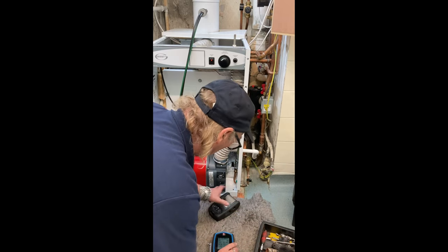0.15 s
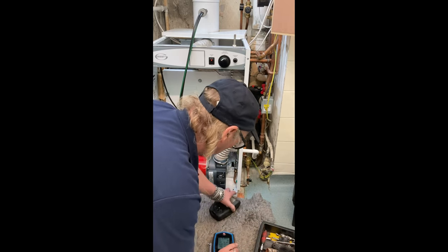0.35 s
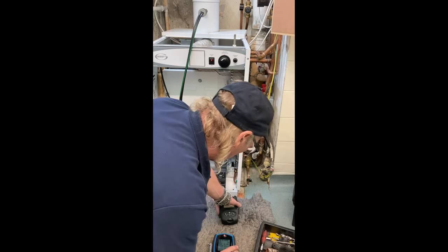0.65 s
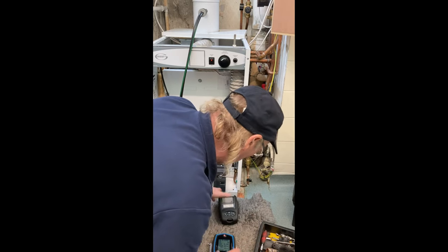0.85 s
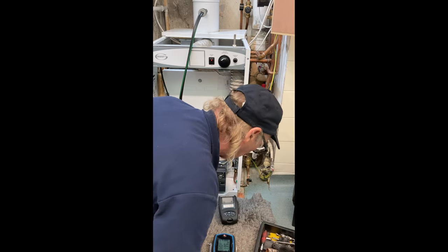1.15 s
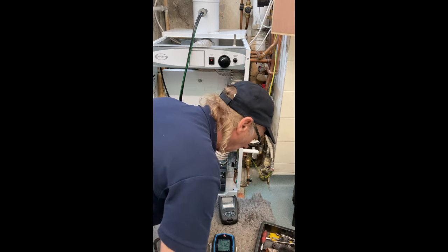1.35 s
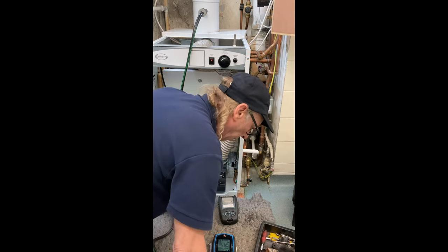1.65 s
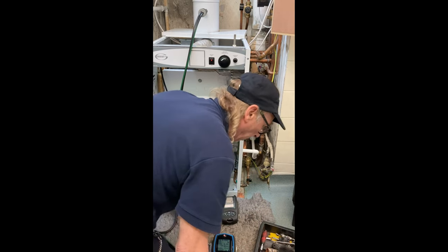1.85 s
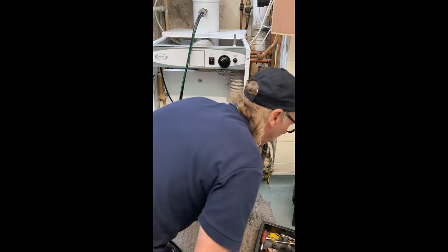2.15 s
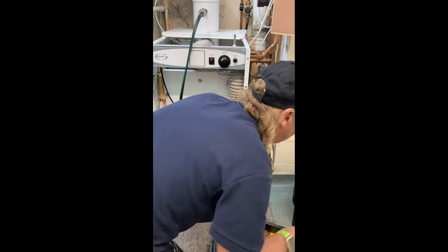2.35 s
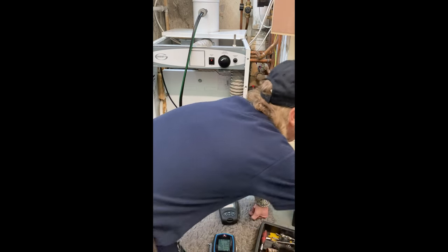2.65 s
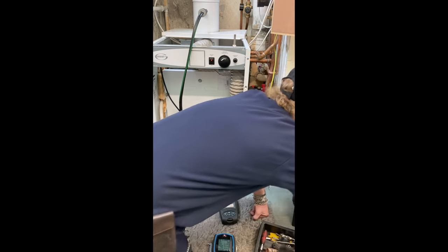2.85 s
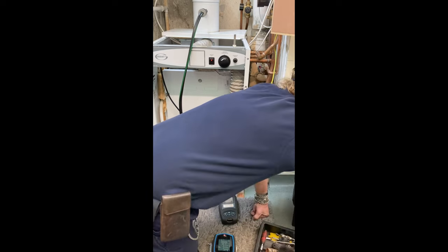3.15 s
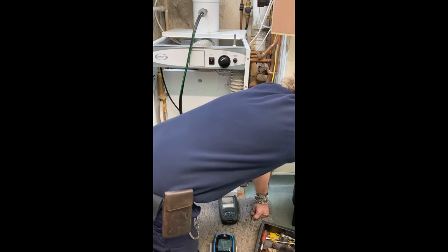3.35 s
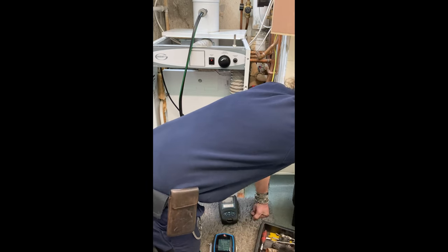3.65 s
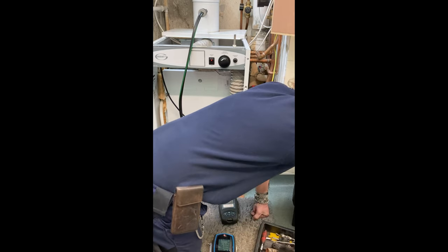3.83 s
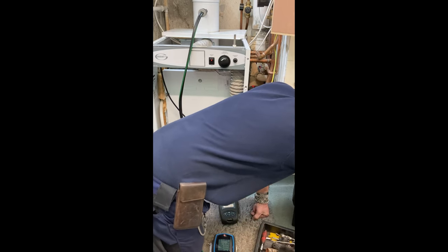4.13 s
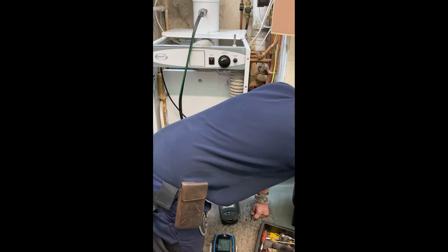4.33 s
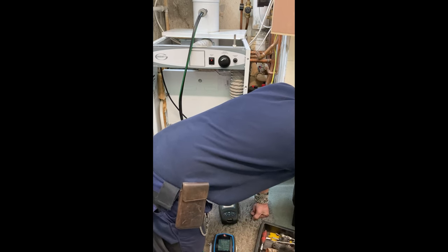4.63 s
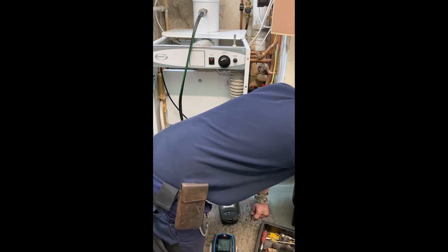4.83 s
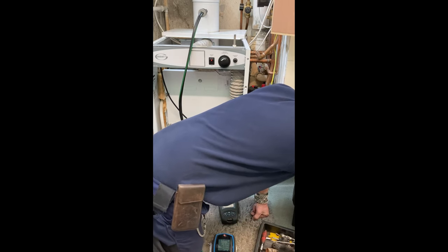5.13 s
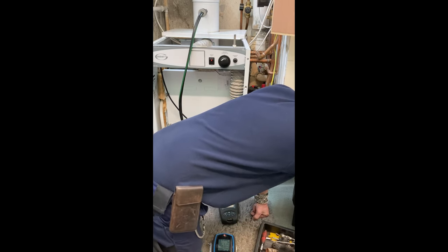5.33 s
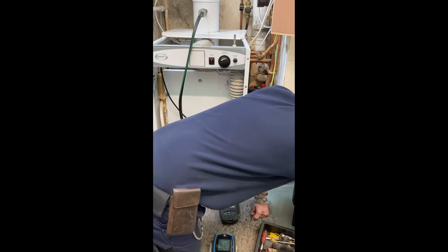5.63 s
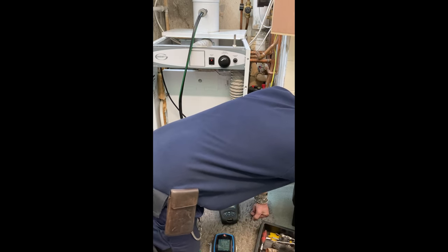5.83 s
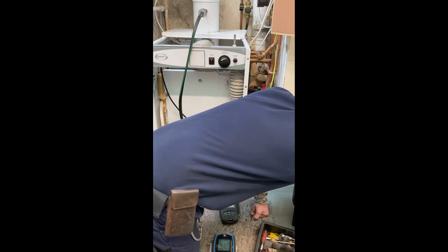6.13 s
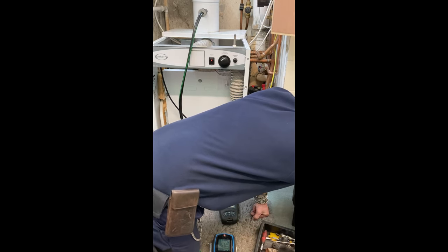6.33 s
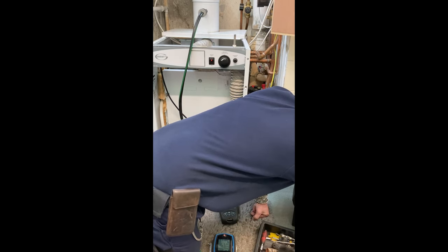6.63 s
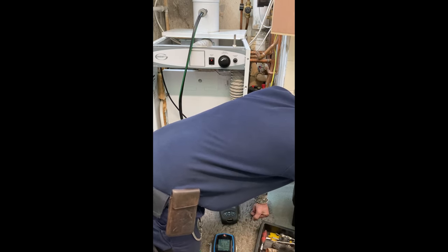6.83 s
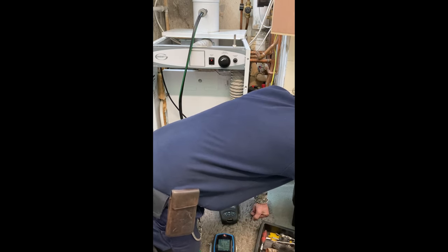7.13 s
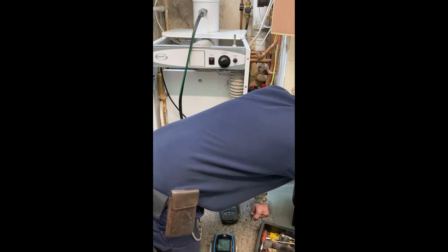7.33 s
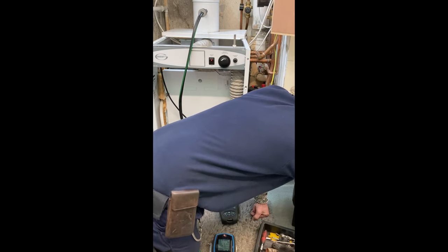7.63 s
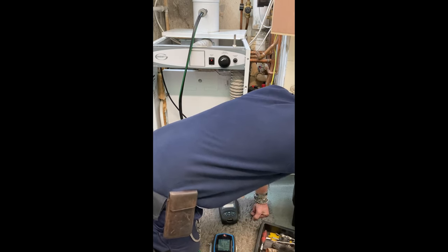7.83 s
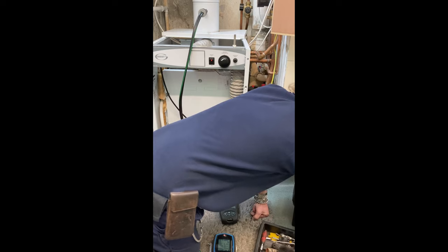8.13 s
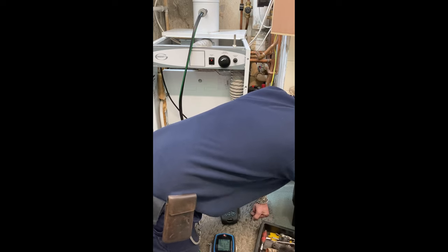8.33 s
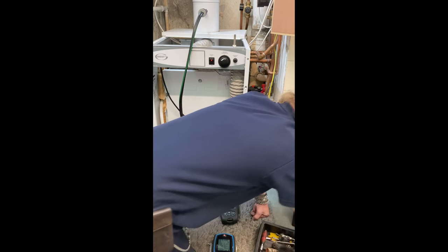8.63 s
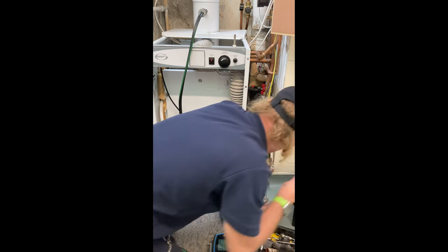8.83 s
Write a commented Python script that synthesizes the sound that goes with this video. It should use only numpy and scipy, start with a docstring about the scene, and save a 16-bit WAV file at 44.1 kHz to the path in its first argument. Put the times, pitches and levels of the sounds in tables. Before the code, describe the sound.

Close by a burner boiler, steady droning roar and hum continue throughout. Someone handles tools on the floor: faint cloth rustle, a sharp heavy clunk with rattling bounces, a second clatter, short gritty scrapes and small ticks, a bright knock, busy clicking, then a weighty thud and a final loud sheet-metal clang. Small reverberant utility room, stereo, wide but near.

```python
"""Handling parts beside an oil boiler

An oil boiler runs in a small hard-walled room: noise shaped like flame rumble and fan hiss, steady
tones of the burner motor, pump and mains, and a pump whine that swells and sinks.
Someone kneeling beside it handles tools and parts: five heavy knocks ring the sheet metal and make
loose parts bounce, among light clicks from dull to hard. Both mix noise bursts with fading tones.
Short scrapes are strings of uneven grains, and the brush of a sleeve is grainy hiss.
"""
import sys
import numpy as np
from scipy import signal
from scipy.fft import rfft, irfft, next_fast_len
from scipy.io import wavfile

SR = 44100
rng = np.random.default_rng(int(sys.argv[2]) if len(sys.argv) > 2 else 0)


def put_to_file(sound):
    """Save the sound as 16-bit audio at rate SR, in the file named by the first command-line argument."""
    columns = np.atleast_2d(sound).T  # one column per channel
    safe = np.clip(columns, -1, 1)
    whole_steps = np.round(safe * 32767)
    wavfile.write(sys.argv[1], SR, whole_steps.astype(np.int16))


N = 396018
TIME = np.arange(N) / SR  # seconds, whole scene
TAIL = np.arange(SR * 3 // 4) / SR  # seconds, longest ring of a blow

# Flame and fan air: [f/Hz, relative level/dB per Hz]
AIR_COLOUR = [(25, -24), (42, -22), (54, -2), (125, -3), (260, -3.5), (400, -4.5), (520, -15), (760, -22),
              (1300, -18), (3000, -18), (6100, -22), (8800, -31.5), (11000, -24), (15500, -36.5)]
AIR_DB = -45  # before flutter and flicker
# Broad resonances of the casing in that noise: [f/Hz, width/Hz, lift/dB]
CASING_RESONANCES = [(197, 13.3, 8.5), (448.4, 10, 11), (646, 123, 8.5), (959, 56, 13.5), (1578, 14, 13),
                     (1790, 21, 5), (2130, 32, 13), (2280, 11, 14), (2413, 54, 9), (3400, 30, 13.5),
                     (3634, 370, 8), (3733, 21, 16.5), (4460, 1130, 7.5), (8550, 1150, 10.5)]
# Narrow standing waves of firebox and flue, fed by the flame, before their slow changes:
# [f/Hz, width/Hz, rms level/dB]
FLUE_DRONES = [(120.5, 2, -65), (163.2, 3, -54.5), (280.6, 1.5, -63), (309, 5, -61), (338.5, 10, -52),
               (2172, 26, -65)]
# The drones swell and sink slowly (rms depth, fastest swells a second) ...
SWELL_DB, SWELL_PER_S = 1, 1.6
# ... start strong and ease off steadily ...
DRONE_START_DB, DRONE_SAG_DB_PER_S = 0.5, 0.28
# ... and surge briefly once
SURGE_AT_S, SURGE_WIDTH_S, SURGE_DB = 1.24, 0.36, 3
# The flame flutters below this; the hiss of the fan lies above
FLUTTER_TOP_HZ = 720
# Nearby walls comb the hiss into fine fixed ripples (rms depth at the points, spacing, full depth above)
RIPPLE_DB, RIPPLE_HZ, RIPPLE_FULL_HZ = 2, 45, 2500
HISS_FLICKER_DB = 1  # rms
# The hiss sinks a little as the body moves in front of the burner: [t/s, level change/dB]
HISS_LEVEL = [(0, 0.2), (1.2, -0.49), (2.8, -0.83), (3.6, -0.92), (8.98, -0.32)]

MOTOR_HZ, PUMP_HZ, MAINS_HZ = 47.1, 103.09, 50
# Steady tones, before they waver: [multiple of the shaft or mains rate, rms level/dB]
MOTOR_TONES = [(2, -50.5), (6, -83)]
PUMP_TONES = [(1, -57), (2, -52.5), (3, -60), (4, -61), (6, -76), (8, -69), (9, -67), (10, -67), (11, -71),
              (13, -75), (19, -71), (20, -69), (24, -75)]
MAINS_TONES = [(2, -69), (8, -67), (12, -67), (26, -68)]
# The pump's whine, before it wavers: [t/s, rms level/dB]
WHINE_LEVEL = [(0.0, -67), (0.32, -59), (0.9, -71), (1.15, -60.5), (1.3, -58.5), (1.8, -58), (2.3, -67),
               (2.6, -63), (2.9, -72), (3.25, -64), (4.0, -72), (4.7, -63), (5.4, -70), (5.7, -62),
               (6.1, -70), (6.4, -63), (7.2, -68), (7.7, -65), (8.98, -70)]

# Levels of the handling below are before the room's standing waves and the microphone.
# Sleeve brushes, before they swell and fade: [t/s, length/s, rms level/dB]
BRUSHES = [(1.09, 0.1, -52), (1.157, 0.15, -44), (2.293, 0.41, -54), (2.457, .16, -39)]
# Hiss of rubbing cloth: [f/Hz, relative level/dB per Hz]
CLOTH_COLOUR = [(3000, -29), (6500, -13), (9500, -8.5), (14000, -4.5), (16000, -9.5)]
# Parts dragged over one another: [t/s, length/s, rms level/dB, brightness/dB per octave]
SCRAPES = [(4.112, 0.07, -41, 0), (4.246, 0.087, -44, 4.5), (4.632, 0.28, -50, 1), (4.962, 0.073, -44, 1),
           (5.136, 0.13, -43, 0), (7.254, .13, -49, -2), (7.434, 0.17, -43, 1), (7.551, 0.12, -50, -5),
           (8.529, 0.18, -38, 2)]
# Colour of a scrape before its brightness: [f/Hz, relative level/dB per Hz]
SCUFF_COLOUR = [(350, -12), (750, 3.5), (1250, 0.5), (2000, -6.5), (2800, -16), (3800, -3.5), (4800, -9),
                (6200, -17), (9000, -22), (14000, -33)]
SLIPS_PER_S, SLIP_SPREAD_DB = 220, 8  # average rate; spread either way

# Light clicks of tools and parts: [t/s, reference level/dB, hardness 0-1 from dull knock to bright tick]
CLICKS = [(3.505, -49, 0), (3.975, -49.5, 0), (4.068, -47, 0.1), (4.099, -40, 0.43), (4.4422, -41.5, 0.08),
          (4.6115, -50.5, 0.76), (4.660, -53, 0.57), (4.696, -48.5, 0.75), (4.725, -50.5, 0.78),
          (4.8414, -50.5, 0.8), (4.970, -49.5, 0.5), (5.085, -42, 0.23), (5.129, -44.5, 0.56),
          (5.280, -54, 0.38), (5.560, -46.5, 0.24), (6.139, -42.5, 0.55), (6.215, -35.5, 0.49),
          (6.440, -48.5, 0), (6.7705, -48.5, 0), (6.9376, -44, 0.57), (7.050, -47, 0), (7.245, -36.5, 0.3),
          (7.254, -38, 0.04), (7.315, -35.5, 0.28), (7.362, -39, 0), (7.432, -46, 0.59),
          (7.566, -39.5, 0.16), (8.7595, -52, 1)]
# From the dullest contact to the hardest: the tap grows first, then the tick
DULL_TAP_DB, HARD_TAP_DB, DULL_TICK_DB, HARD_TICK_DB = -11, 5.5, -20, 13
HARD_TAP_PITCH = 0.78  # share by which the hardest contact raises the tap's pitch
# Spells in which small parts shift and settle, before chance changes:
# [start t/s, length/s, reference level of a contact/dB, hardness 0-1]
FUMBLES = [(2.702, .24, -53.5, 0.33), (7.859, 0.1, -48.5, 0.25)]
FUMBLE_GAP_S, FUMBLE_SPREAD_DB = .04, 2.5
# Heavy knocks: [t/s, then level/dB of: thump of the part's weight, clack, rattle of its edge, tick,
# clang of thin sheet, casing ring, toolbox ring, steel tool ring, first bounce;
# then pitch factors of tick, clack and thump; direct sound over the room/dB]
KNOCKS = [(2.9904, -38, -30.5, -33, -49, -45, -53, -55, -54, -62, 1, 1.37, 1.3, 10),
          (2.993, -30, -25, -25.5, -27, -40, -43.5, -31, -29.5, -36, 1.3, 1, 1.1, 0),
          (3.036, -39, -31, -39, -48, -54, -47, -51, -48, -61, 1, 1.24, 1, 2),
          (4.165, -25, -27.5, -24, -30, -47, -40.5, -32, -48, -35.5, 1.3, 0.9, 0.87, 1),
          (4.222, -51, -53, -33, -55, -62, -56, -62, -54, -56, 0.74, 0.5, 1, 7),
          (4.275, -40, -44, -36.5, -41, -55, -50, -50, -44, -46, 1.7, 1.9, 0.86, 4),
          (6.195, -44, -33, -34, -24.5, -61, -49, -46, -29.5, -42.5, 2.16, 0.97, 0.95, -10.5),
          (8.104, -23.5, -31, -32.5, -34, -54, -40.5, -29.5, -35, -46, 1.38, 1.1, 1.13, 0),
          (8.141, -29, -36.5, -60, -60, -62, -45, -32, -65, -64, 1, 0.91, 1.07, -2),
          (8.3898, -23, -23, -21.5, -22.5, -20, -29, -35, -50, -31, 1.15, 1.04, 1.05, 2.5)]
# Loose parts bounce after a knock, each time weaker
BOUNCE_GAP_S, BOUNCE_FALL_DB = 0.034, 3.5

# Colours of the parts of a blow, before any pitch factor: [f/Hz, relative level/dB per Hz]
THUMP_COLOUR = [(100, -18.5), (180, -10.5), (245, -6), (350, -1.5), (500, -12), (680, -23), (1100, -47),
                (3000, -65)]
CLACK_COLOUR = [(200, -44.5), (520, -1), (700, 2.5), (850, -2.5), (1050, -3), (1350, -5), (2000, -5.5),
                (6000, -32)]
RATTLE_COLOUR = [(600, -4.5), (1200, -1.5), (1580, -12.5), (1850, 5.5), (2200, 2), (2850, 7), (3600, 7.5),
                 (4700, 3.5), (5800, 0), (7800, -40), (14000, -51)]
TICK_COLOUR = [(2500, -22), (5500, -2), (8500, 0), (10500, -1), (14000, -10), (16000, -20), (19000, -32)]
TAP_COLOUR = [(500, -26), (1200, -2), (2100, 0), (2850, -7), (3650, -5), (4800, -14), (7000, -28),
              (14000, -48)]
# The tick of a small, light edge: [f/Hz, relative level/dB per Hz]
LIGHT_TICK_COLOUR = [(2500, -14), (5500, -32), (7500, -3), (8900, 2.5), (10500, 4.5), (14000, -1.5),
                     (16000, -6), (19000, -24)]
# The brief clang of the casing's thin sheet: [f/Hz, relative level/dB per Hz]
CLANG_COLOUR = [(900, -24.5), (1200, -16.5), (1400, -6), (1560, -3), (1750, -14), (2400, -24.5)]

# Ringing tones: [f/Hz, relative level/dB, time to fall 60 dB t60/s]
# The sheet-metal casing
CASING_MODES = [(252, -7, .25), (302, -2, .25), (341, 3, .35), (395, 0, .3), (560, -4, .4), (635, 1, .33),
                (668, -1, .45), (1159, -8, .55), (1266, -1, .55), (1378, -2, .28), (1540, -3, .35),
                (1562, -2, .5), (1846, -12, .55), (2099, -12, .4), (2229, -6, .2), (2358, -15, .6),
                (2794, -10, .5)]
# The large flat panel
PANEL_MODES = [(121, 1, 0.4), (128, -2, 0.12), (137, 4, 0.13)]
# A small steel tool
STEEL_MODES = [(1949, -5, .23), (2056, -3, .25), (2175, -5, .55), (2266, -4, .42), (2340, -3, .25),
               (3542, -4, .3), (8500, -10, .12), (9300, -9, .12), (9884, -4, .2), (12460, -7, .5),
               (13170, -13, .35), (13780, -2, .2), (14600, -10, .19)]
# The hollow toolbox that most things are set down on
TOOLBOX_MODES = [(668, 1, 0.39), (793, -1, 0.2), (818, 2, .2), (842, 2, 0.19), (887, 4, 0.18),
                 (956, 0, 0.22)]
# Loose fittings that clink
LOOSE_MODES = [(1787, -2, .35), (1923, 2, .28), (2374, -1, .3), (2681, -1, .3), (2794, 0, .3),
               (3052, 1, .25), (3240, 1, .16), (3560, 1, .4), (3720, 0, .5), (4130, -5, .3), (4328, -3, .3),
               (4753, -3, .25)]
PANEL_DB, LOOSE_DB = 7, -10.5  # panel against casing ring; loose fittings against an edge's rattle
MODE_SPREAD_DB = 2  # each tone differs by up to this, either way, from blow to blow

# How long the room's reflections last: [f/Hz, t60/s]
ROOM_DECAY = [(100, 0.15), (400, 0.31), (1000, 0.33), (3500, 0.23), (8000, 0.42), (15000, 0.15)]
# Peaks and nulls of the room's standing waves: [f/Hz, width/Hz, lift/dB]
STANDING_WAVES = [(108, 9.3, 1), (220, 28, -1.5), (301, 11, 1.5), (382, 7.6, -3.5), (389.5, 12, 1.5),
                  (487, 12, -1), (508, 25, 7.5), (533, 26, -8), (577, 21, 5), (611, 23, -3), (624, 31, 1),
                  (910, 33, 1.5), (1040, 75, -4.5), (1420, 39, -6.5)]
# Left-right likeness: [f/Hz, likeness 0-1]
LIKENESS = [(60, .98), (150, .98), (270, .95), (500, .58), (1500, .5), (3500, .35), (5500, .6), (7500, .9),
            (15000, .88)]
# By how much the left port leads the right: [f/Hz, phase/radians]
PORT_PHASE = [(0, 0), (340, -.12), (600, -.8), (1380, -1.15), (2800, -1.8), (5800, -2.5), (7700, -.8),
              (9000, .7), (11400, 3.1), (12300, 3.2), (13900, 5.2), (16000, 6.4)]
# Left minus right: [f/Hz, level/dB]
BOILER_LEAN = [(60, 2.6), (200, 1), (1000, .4), (8000, 0)]
HANDLING_LEAN = [(120, 1.5), (280, 0.5), (600, -0.5), (1400, -1.5), (3000, 0.1), (12000, 0.5)]
HANDLING_LOW_HZ = 50  # the handling has no deep bass
# A narrow treble notch and a soft top: [f/Hz, level/dB]
MICROPHONE_COLOUR = [(10700, 0), (11200, -4), (11600, -26), (12150, -26), (12650, -2), (13200, 0),
                     (15000, -2), (16000, -13)]
EDGE_HZ = 16200  # upper limit of the sound


def amp(db):
    """Turns decibels into gain."""
    return 10 ** (np.asarray(db) / 20)


def evened(x):
    """Scales to rms 1."""
    return x / np.sqrt(np.mean(x ** 2) + 1e-20)


def read(points, hz):
    """Joins points by straight lines on a log-frequency axis."""
    f, value = np.transpose(points)
    return np.interp(np.log(hz + 1), np.log(f + 1), value)


def bell(hz, centre, width):
    """A resonance peak: 1 at the centre, half that at half a width to either side."""
    return 1 / (1 + (2 * (hz - centre) / width) ** 2)


def add(mix, s, sound):
    """Lays a two-channel sound into the mix at time s."""
    part = mix[:, max(round(s * SR), 0):][:, :sound.shape[1]]
    part += sound[:, :part.shape[1]]


def coloured(x, spectrum, size=2048):
    """Filters with the given spectrum; it rings only after its input, never before."""
    log_gain = np.log(amp(read(spectrum, abs(np.fft.fftfreq(size, 1 / SR)))))
    # the phase that goes with the gain keeps the filter from acting early
    taps = np.fft.ifft(np.exp(np.conj(signal.hilbert(log_gain)))).real
    return signal.oaconvolve(x, taps[None], axes=1)[:, :x.shape[1]]


def drift(rate, count=16):
    """Wanders slowly by sines of random phase: rms 1, up to the given rate a second."""
    t = TIME[::256]
    slow = np.zeros(len(t))
    for f in np.geomspace(rate / 10, rate, count):
        slow += np.sin(2 * np.pi * (f * t + rng.random())) / np.sqrt(f)
    return np.interp(TIME, t, evened(slow))


def flame(flutter_db=0.6):
    """Turbulent flame and fan air: a broad roar coloured by the casing, and narrow drones in the flue."""
    size = next_fast_len(N, True)
    hz = np.fft.rfftfreq(size, 1 / SR)

    noise = rfft(rng.standard_normal((2, size)))
    lift = 1  # power gain of the casing
    for f, width, db in CASING_RESONANCES:
        lift = lift + (amp(db) ** 2 - 1) * bell(hz, f, width) ** 1.13
    steps = np.arange(0, SR / 2, RIPPLE_HZ)
    ripple_db = RIPPLE_DB * np.interp(hz, steps, rng.standard_normal(len(steps)))
    ripple_db *= np.minimum(hz / RIPPLE_FULL_HZ, 1)
    gain = amp(read(AIR_COLOUR, hz) + ripple_db) * np.sqrt(abs(lift))
    roar = evened(irfft(noise * gain, size)[:, :N])

    low_pass = signal.butter(2, FLUTTER_TOP_HZ, fs=SR, output="sos")
    rumble = signal.sosfiltfilt(low_pass, roar)
    hiss_db = np.interp(TIME, *np.transpose(HISS_LEVEL)) + HISS_FLICKER_DB * drift(35)
    hiss = (roar - rumble) * amp(hiss_db)
    rumble = rumble * amp(flutter_db * drift(11.0))

    peaks = sum(amp(db) * evened(bell(hz, f, width)) for f, width, db in FLUE_DRONES)
    drone = irfft(rfft(rng.standard_normal((2, size))) * peaks, size)[:, :N]
    drone_db = DRONE_START_DB - DRONE_SAG_DB_PER_S * TIME + SWELL_DB * drift(SWELL_PER_S)
    drone_db += SURGE_DB * np.exp(-((TIME - SURGE_AT_S) / SURGE_WIDTH_S) ** 2)
    return amp(AIR_DB) * (hiss + rumble) + drone * amp(drone_db)


def hum(hz, orders, wander):
    """Multiples of a shaft or mains rate that drifts slightly; short waves waver most in the room."""
    turns = np.cumsum(hz * (1 + wander * drift(1.9))) / SR
    out = np.zeros(N)
    for order, db in orders:
        depth_db = 2.2 * min(np.sqrt(order * hz / 1500), 1)
        level = amp(db + depth_db * drift(2.2))
        out += level * np.sin(2 * np.pi * (round(order) * turns + rng.random()))
    return np.sqrt(2) * out  # from rms level to peak


def whine(order=15, waver_db=1, wobble=0.47):
    """The pump sings on one wavering line, which swells and sinks slowly."""
    level_db = np.interp(TIME, *np.transpose(WHINE_LEVEL)) + waver_db * drift(7.3)
    phase = 2 * np.pi * order * PUMP_HZ * TIME + wobble * drift(12)  # wobble in radians rms
    return np.sqrt(2) * amp(level_db) * np.cos(phase)


def room(late_db=-17, late_t60=1.0, build_s=0.0096):
    """Dense reflections that die by band, and a faint longer ring of pipes and panels; left energy 1."""
    taps = rng.standard_normal((2, len(TAIL)))
    taps *= rng.random((2, len(TAIL))) < 5000 / SR  # about 5000 reflections a second
    hz, t, z = signal.stft(taps, SR, nperseg=256)
    hz = hz[:, None]
    decay = amp(-60 * t / read(ROOM_DECAY, hz))
    decay = decay + amp(late_db - 60 * t / late_t60) / (1 + (hz / 5000) ** 2)
    tail = signal.istft(z * decay, SR, nperseg=256)[1][:, :len(TAIL)]
    tail = tail * (1 - np.exp(-TAIL / build_s))
    return tail / np.linalg.norm(tail[0])


def levelled(x, db):
    """Sets a hit's left-channel energy to that of 50 ms at the given level."""
    return amp(db) * x / np.sqrt(np.sum(x[0] ** 2) / (SR / 20))


def contact(space, spectrum, db, direct_db, chatter_s):
    """Two surfaces chatter for a moment as they meet, the room answers, and the object colours both."""
    u = TAIL[:SR // 20] / chatter_s
    burst = rng.standard_normal(len(u)) * u * np.exp(-u)
    heard = space.copy()
    # the direct sound goes to the common channel only
    heard[0, :len(u)] += amp(direct_db) * burst / np.linalg.norm(burst)
    return levelled(coloured(heard, spectrum), db)


def ring(modes, db, rise_s):
    """Struck metal rings; every blow lands elsewhere and weights the modes a little differently."""
    out = np.zeros((2, len(TAIL)))
    for hz, level, t60 in modes:
        t = TAIL[TAIL < t60]
        fade = amp(level + MODE_SPREAD_DB * rng.uniform(-1, 1) - 60 * t / t60)
        out[:, :len(t)] += fade * np.sin(2 * np.pi * (hz * t + rng.random((2, 1))))
    return levelled(out * (1 - np.exp(-TAIL / rise_s)), db)


def sleeve(grain=0.48):
    """Cloth fibres slip in a short grainy hiss that swells fast and fades."""
    out = np.zeros((2, N))
    for s, length, db in BRUSHES:
        u = np.linspace(0, 1, round(length * SR))
        fibres = rng.standard_normal((2, len(u))) * np.exp(grain * rng.standard_normal(len(u)))
        swell = np.sin(np.pi * u ** 0.37)
        add(out, s, amp(db) * evened(coloured(fibres, CLOTH_COLOUR)) * swell)
    return out


def scrapes(direct_db=2, ring_db=-9):
    """A part is dragged: it sticks and slips in uneven grains, which shake the loose fittings."""
    out = np.zeros((2, N))
    for s, length, db, tilt_db in SCRAPES:
        u = np.linspace(0, 1, round(length * SR))
        slips = (rng.random(len(u)) < SLIPS_PER_S / SR) * rng.standard_normal(len(u))
        slips = slips * amp(SLIP_SPREAD_DB * rng.uniform(-1, 1, len(u)))
        stroke = slips * np.sin(np.pi * u ** .7) ** .5
        colour = [(hz, level + tilt_db * np.log2(hz / 2000)) for hz, level in SCUFF_COLOUR]
        # one grain, repeated at every slip
        body = contact(room(), colour, 0, direct_db=direct_db, chatter_s=0.0011)
        body += ring(LOOSE_MODES, ring_db, rise_s=.001)
        sound = signal.fftconvolve(stroke[None], body, axes=1)
        add(out, s, amp(db) * sound / np.sqrt(np.sum(sound[0] ** 2) / len(u) + 1e-20))
    return out


def click(db, hardness, tool_ring_db=-13, settle_db=-12, clack_db=-3, box_db=-4, loose_db=-7):
    """A light thing touches with no weight behind it, slips and touches again; harder is brighter."""
    space, hard = room(), np.clip(hardness, 0, 1)
    tap_db = db + HARD_TAP_DB + (DULL_TAP_DB - HARD_TAP_DB) * (1 - hard) ** 2
    tick_db = db + DULL_TICK_DB + (HARD_TICK_DB - DULL_TICK_DB) * hard
    tap = [(hz * (1 + HARD_TAP_PITCH * hard ** 2), level) for hz, level in TAP_COLOUR]

    out = contact(space, LIGHT_TICK_COLOUR, tick_db, direct_db=2.0, chatter_s=0.0017)
    out += ring(STEEL_MODES, tick_db + tool_ring_db, rise_s=.001)
    out += contact(space, tap, tap_db, direct_db=0, chatter_s=0.002)
    out += ring(LOOSE_MODES, tap_db + loose_db, rise_s=0.0091)
    out += contact(space, CLACK_COLOUR, db + clack_db, direct_db=1, chatter_s=0.0022)
    out += ring(TOOLBOX_MODES, db + box_db, rise_s=0.00053)
    # the second touch, with the room's channels swapped
    again = contact(space[::-1], tap, tap_db + settle_db, direct_db=-3, chatter_s=0.0015)
    add(out, rng.uniform(.008, .03), again)
    return out


def clicks():
    """The distinct clicks, and the fainter chance contacts of parts that shift."""
    out = np.zeros((2, N))
    for s, db, hardness in CLICKS:
        add(out, s, click(db, hardness))
    for start, length, db, hardness in FUMBLES:
        for s in np.arange(start, start + length, FUMBLE_GAP_S):
            late_s = FUMBLE_GAP_S * rng.uniform(0, 0.37)
            chance_db = FUMBLE_SPREAD_DB * rng.uniform(-2.1, 1)
            add(out, s + late_s, click(db + chance_db, hardness * rng.uniform(0.66, 1.13)))
    return out


def bounces(space, db, count=4):
    """Shaken parts fall back a few times at uneven gaps, each time with a small clink."""
    out = np.zeros((2, SR))
    for k, s in enumerate(np.cumsum(BOUNCE_GAP_S * rng.uniform(0.5, 1.8, count))):
        fall_db = db - BOUNCE_FALL_DB * k
        clink = contact(space[::-1], RATTLE_COLOUR, fall_db, direct_db=1, chatter_s=.0012)
        add(out, s, clink + ring(LOOSE_MODES, fall_db + LOOSE_DB, rise_s=0.0011))
    return out


def shifted(colour, pitch):
    """Moves a colour up or down by a pitch factor."""
    return [(hz * pitch, db) for hz, db in colour]


def knocks(tick_near_db=3, rattle_near_db=-7, thump_near_db=4, clack_near_db=2):
    """A hard edge ticks, the weight arrives, the sheet clangs, the panel swings, loose parts bounce."""
    out = np.zeros((2, N))
    for (s, weight_db, clack_db, edge_db, tick_db, clang_db, casing_db, box_db, tool_db, bounce_db,
         tick_pitch, clack_pitch, thump_pitch, near_db) in KNOCKS:
        space = room()
        tick = contact(space, shifted(TICK_COLOUR, tick_pitch), tick_db,
                       direct_db=near_db + tick_near_db, chatter_s=.0015)
        add(out, s, tick + ring(STEEL_MODES, tool_db, rise_s=0.0011))

        rattle = contact(space, RATTLE_COLOUR, edge_db,
                         direct_db=near_db + rattle_near_db, chatter_s=0.0023)
        add(out, s, rattle + ring(LOOSE_MODES, edge_db + LOOSE_DB, rise_s=0.0037))

        clack = contact(space, shifted(CLACK_COLOUR, clack_pitch), clack_db,
                        direct_db=near_db + clack_near_db, chatter_s=0.0035)
        add(out, s + 0.001105, clack + ring(TOOLBOX_MODES, box_db, rise_s=0.0038))

        thump = contact(space, shifted(THUMP_COLOUR, thump_pitch), weight_db,
                        direct_db=near_db + thump_near_db, chatter_s=0.0035)
        add(out, s + 0.00169, thump + ring(CASING_MODES, casing_db, rise_s=0.0036))

        clang = contact(space, CLANG_COLOUR, clang_db, direct_db=near_db, chatter_s=0.0039)
        add(out, s + .003, clang)
        add(out, s + 0.007, ring(PANEL_MODES, casing_db + PANEL_DB, rise_s=0.002))
        add(out, s, bounces(space, bounce_db))
    return out


def standing_waves(x):
    """The small room lifts some low notes and cancels others at the microphone."""
    hz = np.fft.rfftfreq(16384, 1 / SR)
    lift_db = sum(db * bell(hz, f, width) for f, width, db in STANDING_WAVES)
    return coloured(x, np.column_stack([hz, lift_db]), size=16384)


def ports(pair, lean):
    """Two microphone ports hear a common field, plus and minus an unrelated one, with phase and lean."""
    size = next_fast_len(N, True)
    hz = np.fft.rfftfreq(size, 1 / SR)
    same = np.clip(read(LIKENESS, hz), 0, 1)
    common, apart = rfft(pair, size) * np.sqrt([(1 + same) / 2, (1 - same) / 2])
    # each port takes half of the phase and half of the lean
    turn = np.exp(.5j * np.interp(hz, *np.transpose(PORT_PHASE))) * amp(read(lean, hz) / 2)
    return irfft(np.array([(common + apart) * turn, (common - apart) / turn]), size)[:, :N]


def scene():
    """The boiler leans a little to the left; the handling's lean varies with pitch."""
    tones = hum(MOTOR_HZ, MOTOR_TONES, wander=0.00037)
    tones += hum(PUMP_HZ, PUMP_TONES, wander=0.000095)
    tones += hum(MAINS_HZ, MAINS_TONES, wander=.0001)
    tones += whine()
    boiler = ports(flame() + np.array([tones, np.zeros(N)]), BOILER_LEAN)

    handling = standing_waves(sleeve() + scrapes() + clicks() + knocks())
    high_pass = signal.butter(2, HANDLING_LOW_HZ, "high", fs=SR, output="sos")
    return boiler + ports(signal.sosfilt(high_pass, handling), HANDLING_LEAN)


def record(dry):
    """The microphone's colour, then the band limit."""
    band_limit = signal.firwin(511, EDGE_HZ, window=("kaiser", 9), fs=SR)
    return signal.oaconvolve(coloured(dry, MICROPHONE_COLOUR), band_limit[None], "same")


dry = scene()
out = record(dry)
put_to_file(out)
```